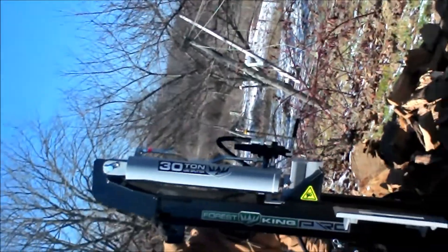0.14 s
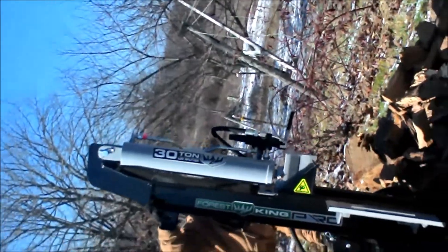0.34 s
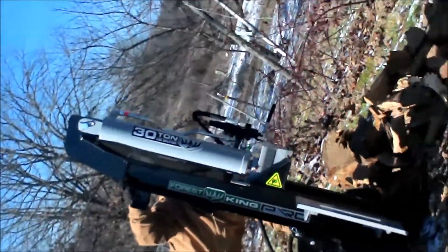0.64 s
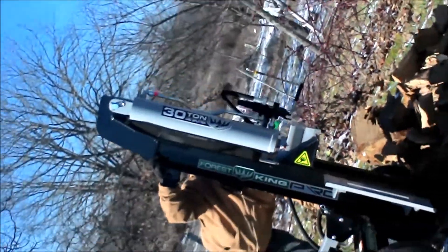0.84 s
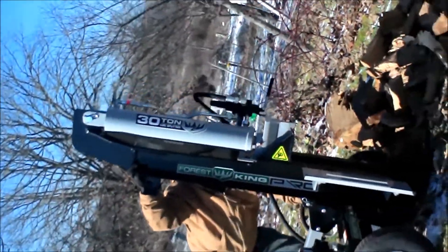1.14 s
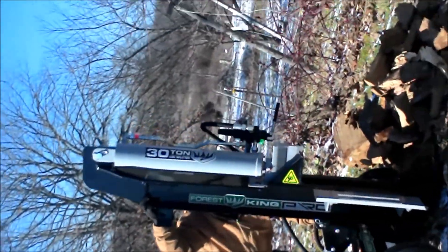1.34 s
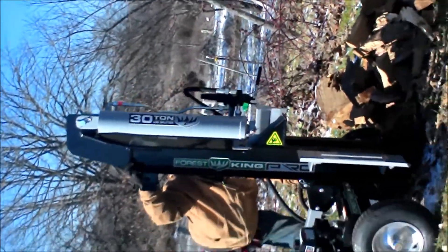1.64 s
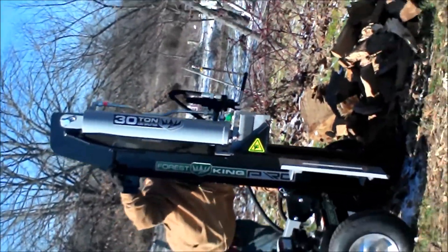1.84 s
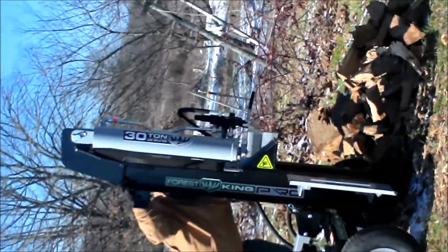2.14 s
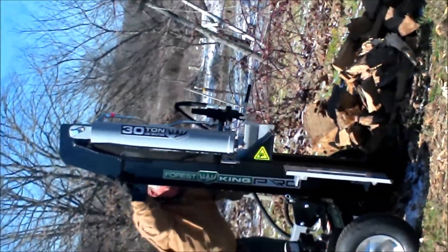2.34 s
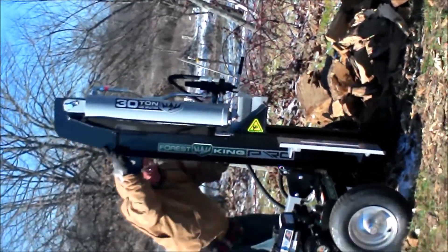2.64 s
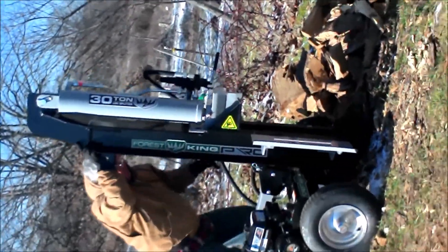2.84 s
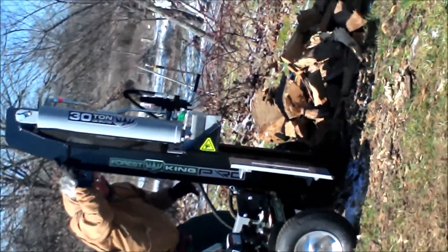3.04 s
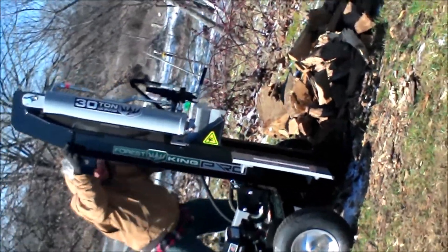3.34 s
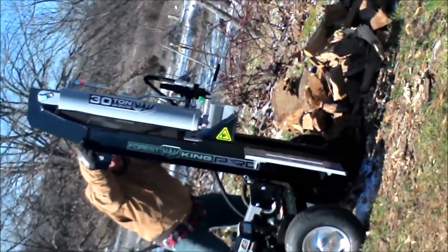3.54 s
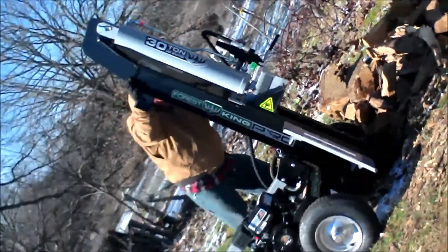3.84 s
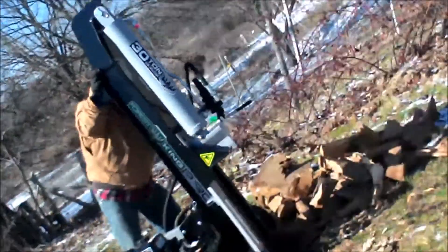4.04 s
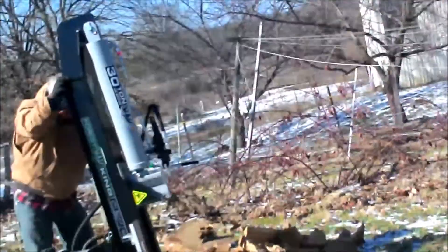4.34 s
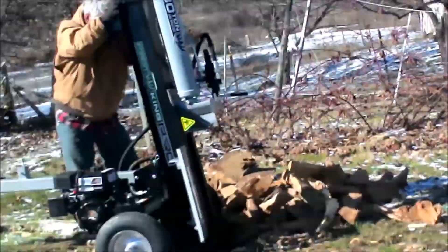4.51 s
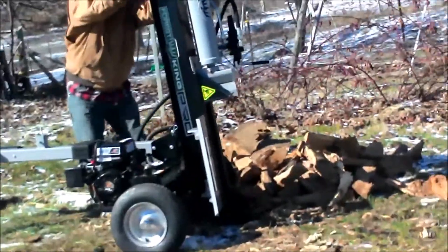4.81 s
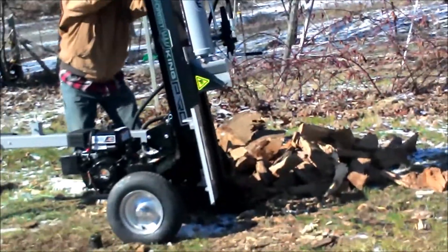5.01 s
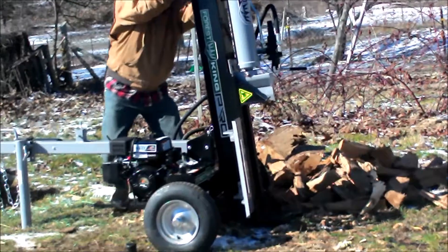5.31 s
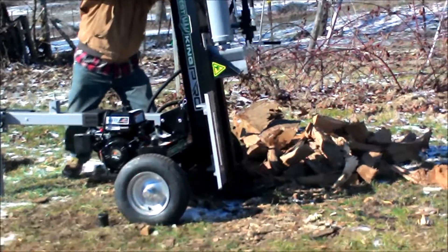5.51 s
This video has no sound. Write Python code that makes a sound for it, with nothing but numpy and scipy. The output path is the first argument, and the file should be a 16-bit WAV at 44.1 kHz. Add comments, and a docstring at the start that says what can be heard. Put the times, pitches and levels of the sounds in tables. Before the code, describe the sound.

From 0 s a small four-stroke engine on a log splitter idles steadily in an open yard, firing about seventeen times a second: low rounded exhaust thuds, busy valve clatter, a thin gear whine and pulsing pump hiss. Its speed wavers only slightly. Soft low wind rumbles faintly on the microphone around 0.6-1.4 s. At 1.95 s a log gives way in a sudden, very loud dry crack, several fractures crowded within about 50 ms, while the steel beam clanks brightly. The ring and a short scattered echo off woodpile and trees fade within roughly half a second. The recording level dips after the blow, leaving the engine somewhat quieter. The metallic treble grows duller toward 3.3 s. Between about 3.9 and 4.3 s the microphone swings and the engine becomes harder, brighter and raspier, continuing until the end at about 5.7 s. Stereo is narrow, with bass centred.

```python
"""An idling single-cylinder four-stroke on a log splitter: exhaust thuds, valve clatter, pump hiss, light breeze.
Near 2 s a log gives way: noise bursts make the crack, ringing modes the beam clank, echoes and a wash the yard.
The crank phase times the engine's gas strokes, contacts and noise, which excite pipe and block resonances.
The blow pulls the recorder gain down. Near 4 s the microphone swings round and the engine sounds harder."""
import sys
import numpy as np
from scipy import signal
from scipy.fft import rfft, irfft, next_fast_len
from scipy.io import wavfile

SR = 44100
rng = np.random.default_rng(int(sys.argv[2]) if len(sys.argv) > 2 else 0)


def master_out(mix):
    """Clip the mix to full scale and print it as 16-bit PCM to the path in sys.argv[1]."""
    frames = np.transpose(np.atleast_2d(mix))
    ceiling = np.clip(frames, -1, 1)
    pcm = np.round(ceiling * 32767).astype(np.int16)
    wavfile.write(sys.argv[1], SR, pcm)


N = 250047
TIME = np.arange(N) / SR   # s


def from_db(db):
    """Decibels to amplitude gain."""
    return 10 ** (np.asarray(db) / 20)


def rms_one(x):
    """Scale to rms 1."""
    return x / np.sqrt(np.mean(x ** 2) + 1e-20)


def in_time(rows):
    """Interpolate each column of a time curve to one value a sample."""
    s, *columns = np.transpose(rows)
    return [np.interp(TIME, s, column) for column in columns]


def at_hz(points, hz):
    """Read a spectrum on a log-frequency axis."""
    known_hz, level_db = np.transpose(points)
    return np.interp(np.log(np.maximum(hz, 1)), np.log(known_hz), level_db)


def colour(x, spectrum):
    """Causal minimum-phase filter with the given spectrum; white noise keeps its power."""
    size = 2 ** 13
    gain = rms_one(from_db(at_hz(spectrum, np.fft.rfftfreq(size, 1 / SR))))
    cepstrum = irfft(np.log(gain))[:size // 2]
    cepstrum[1:] *= 2   # fold to minimum phase
    response = irfft(np.exp(rfft(cepstrum, size)))[:size // 2]
    return signal.oaconvolve(x, response)[:N]


def resonate(x, hz, width_hz):
    """Two-pole resonance with peak gain 1."""
    r = np.exp(-np.pi * width_hz / SR)
    zeros = np.array([1, 0, -1]) * (1 - r * r) / 2
    poles = [1, -2 * r * np.cos(2 * np.pi * hz / SR), r * r]
    return signal.lfilter(zeros, poles, x + 1e-18)


def ring(x, hz, t60_s):
    """Damped mode: a unit click starts a decaying sine of height 1."""
    r = from_db(-60 / (t60_s * SR))
    w = 2 * np.pi * hz / SR
    return signal.lfilter([0, np.sin(w)], [1, -2 * r * np.cos(w), r * r], x + 1e-18)


def smooth(x, lag_s):
    """One-pole lag."""
    r = np.exp(-1 / (lag_s * SR))
    return signal.lfilter([1 - r], [1, -r], x)


def high_pass(x, cut_hz):
    """Second-order low cut."""
    return signal.sosfilt(signal.butter(2, cut_hz, "high", fs=SR, output="sos"), x)


def clicks(times_s, sizes):
    """One click of each size at each time."""
    inside = (times_s >= 0) & (times_s < TIME[-1])
    return np.bincount((times_s[inside] * SR).astype(int), sizes[inside], N)


def dying(start_s, decay_s):
    """Envelope that jumps to 1 and falls exponentially."""
    return (TIME >= start_s) * np.exp(-np.maximum(TIME - start_s, 0) / decay_s)


def bump(x, centre, width):
    """Bell curve of height 1; width is one standard deviation."""
    return np.exp(-.5 * ((x - centre) / width) ** 2)


# wind noise spectrum, relative: [hz, level_db_per_hz]
WIND = [(15, -13.5), (45, -0.5), (90, -1), (200, -14.5), (600, -41)]
# gusts: [centre_s, peak_db, width_s]
GUSTS = [(.65, -63, .06), (0.845, -60.5, .2), (1.35, -63, 0.073)]
CALM_DB = -79   # between gusts


def breeze():
    """Light air rumbles on the microphone and rises in bell-shaped gusts."""
    gusts = sum(from_db(peak_db) * bump(TIME, centre_s, width_s) for centre_s, peak_db, width_s in GUSTS)
    return (from_db(CALM_DB) + gusts) * colour(rng.standard_normal(N), WIND)


# echoes off woodpile and sheds: [delay_s, level_db]
ECHOES = [(0.033, -24.5), (0.102, -22.5), (.135, -27)]
# scattered sound spectrum, relative: [hz, level_db_per_hz]
YARD = [(240, -41.5), (400, -19), (680, -22.5), (854, -2), (1140, -17), (1640, -5), (3290, -9.5),
        (6220, -7.5), (7580, -12.5), (8060, -20.5), (10900, -11), (12900, -42.5), (15000, -36)]


def yard(x, scatter_db, scatter_s, build_s):
    """Distinct echoes, and a noise wash scattered by the trees that follows the lagged power of the blow."""
    echoes = sum(from_db(level_db) * np.interp(TIME - delay_s, TIME, x, left=0) for delay_s, level_db in ECHOES)
    lingering = np.sqrt(smooth(smooth(x ** 2, scatter_s), build_s) + 1e-18)
    wash = lingering * colour(rng.standard_normal(N), YARD)
    return x + echoes + from_db(scatter_db) * wash


# crack spectrum, relative: [hz, level_db_per_hz]
CRACK = [(240, -65.5), (400, -32), (1000, -16.5), (1360, -19.5), (2030, -5.5), (2220, -13.5), (2470, -5.5),
         (3160, -24), (3680, -8), (5070, 0), (7790, -11), (10400, -13), (12100, -18.5), (12900, -41.5),
         (15500, -37.5)]
# run of fractures, also jolting the beam: [start_s, level_db, decay_s]
FRACTURES = [(1.9503, -19, .004), (1.9531, -11, 0.0075), (1.9588, -20.5, .006), (1.9668, -23, 0.0035),
             (1.9738, -31.5, .003), (1.985, -22.5, 0.0073), (1.9949, -35, .004), (2.002, -30, .006)]


def log_crack(rise_s, grain_db, grain_s):
    """Each fracture is a short noise burst of fibres snapping in uneven clumps."""
    force = sum(from_db(level_db) * dying(start_s, decay_s) for start_s, level_db, decay_s in FRACTURES)
    grain = rms_one(smooth(rng.standard_normal(N), grain_s))
    clumps = rms_one(from_db(grain_db * grain))
    return colour(smooth(force, rise_s) * clumps * rng.standard_normal(N), CRACK)


# steel beam modes: [pitch_hz, level_db, t60_s before load damping]
BEAM = [(640, -17, .35), (845, -15, .8), (1023, -13, .3), (1297, -15, .37), (1492, -7, .3),
        (1622, -13, 1.4), (1690, -13, 1.4), (1760, -9, .25), (2082, -5, .28), (2277, -7, .3),
        (2487, -7, .3), (2568, -10, .35), (2751, -10, .2), (3585, -12, .25), (3807, -5, .2),
        (4351, -6, .27), (4506, 0, .22), (4748, -6, .22), (5011, -2, .15), (5153, -1, .22), (5717, -7, .26),
        (6125, -6, .22), (6340, -5, .3), (6875, -11, .35), (7301, -6, .33), (8848, -18, .33),
        (9145, -13, .21), (9765, -18, .3), (10115, -14, .23), (10603, -11, .42)]
BEAM_DAMPING_S = 0.501   # the load mutes the longest rings


def beam_clank(level_db):
    """Every fracture jolts each steel mode in a random direction; the loaded beam dies faster."""
    start_s, jolt_db, _ = np.transpose(FRACTURES)
    clank = 0
    for pitch_hz, mode_db, t60_s in BEAM:
        jolts = from_db(jolt_db) * rng.choice([-1, 1], len(start_s))
        clank = clank + from_db(level_db + mode_db) * ring(clicks(start_s, jolts), pitch_hz, t60_s)
    return clank * dying(start_s[0], BEAM_DAMPING_S)


def log_split():
    """Crack and clank together, heard across the yard."""
    crack = from_db(2.0) * log_crack(rise_s=.0007, grain_db=3.0, grain_s=0.00035)
    blow = crack + beam_clank(level_db=-15)
    return yard(blow, scatter_db=-13.5, scatter_s=0.024, build_s=0.014)


SWELL_DB, SWELL_AT_MS, SWELL_WIDTH_MS = 1.5, -1.0, 3.5   # ms after the firing
LULL_DB, LULL_AT_MS, LULL_WIDTH_MS = -2.5, 27, 4.6


def gas_rush(cycle, speed_hz):
    """Gas and gear noise swells once a cycle as the exhaust valve opens, and sinks once."""
    def near(at_ms, width_ms):
        """Bell round one moment of every cycle."""
        phase = (cycle - speed_hz * at_ms / 1000 + .5) % 1
        return bump(phase, .5, speed_hz * width_ms / 1000)
    swell_db = SWELL_DB * near(SWELL_AT_MS, SWELL_WIDTH_MS)
    lull_db = LULL_DB * near(LULL_AT_MS, LULL_WIDTH_MS)
    return rms_one(from_db(swell_db + lull_db))


def fins(x, ring_db, ring_s):
    """Cooling fins and covers add a thicket of brief, unrelated resonances."""
    t = TIME[:SR // 25]
    response = rng.standard_normal(len(t)) * np.exp(-t / ring_s)
    response = response / np.linalg.norm(response)
    return rms_one(x + from_db(ring_db) * signal.oaconvolve(x, response)[:N])


# hiss spectra from side and front, relative: [hz, level_db_per_hz]
HISS_SIDE = [(300, -0.5), (650, -2.5), (900, -0.5), (2500, 1.5), (3150, -13), (3600, -4), (4050, -8.5),
             (5000, -2), (6600, -3.5), (8350, -19.5), (9400, -9.5), (11500, -20), (13300, -25.5),
             (15000, -22)]
HISS_FRONT = [(300, 12.5), (600, -2.5), (900, -7.5), (2000, 2.5), (2400, 2), (2950, 7.5), (3700, -14.5),
              (5000, -4.5), (6300, 1.5), (8000, -8), (9600, -8), (11500, -20), (15000, -17.5)]
PUMP_TEETH_PER_CYCLE = 22


def hiss(cycle, rush, knocks, front, tooth_depth, tick_s, tick_db):
    """Gas and gear noise pulses with the pump's teeth; each contact adds a short bright tick."""
    teeth = 1 + tooth_depth * np.cos(2 * np.pi * PUMP_TEETH_PER_CYCLE * cycle)
    ticks = from_db(tick_db) * rms_one(smooth(knocks, tick_s))
    strength = np.hypot(rush * teeth, ticks)
    noise = fins(strength * rng.standard_normal(N), ring_db=-5.5, ring_s=0.0036)
    return (1 - front) * colour(noise, HISS_SIDE) + front * colour(noise, HISS_FRONT)


GEAR_TEETH, WHINE_DB = 31, -14   # level against the clatter


def gear_whine(cycle):
    """Crank gear teeth mesh in a thin tone, two turns a cycle."""
    return from_db(WHINE_DB) * rms_one(np.sin(2 * np.pi * GEAR_TEETH * 2 * cycle))


# valve train and piston contacts: [after_firing_ms, level_db relative]
CONTACTS = [(-8.5, -2.5), (-4.5, -3), (-1.5, -0.5), (0.68, -1), (4.5, -10), (9.5, -2.5), (13.5, -2),
            (16.5, -4.5), (21.5, -4), (26.5, -7.5), (32, -4), (34, -3), (38, -2.5), (43, -5.5), (47, -8.5)]
# shroud, tank and block resonances: [pitch_hz, width_hz, level_db relative]
BLOCK = [(430, 86, -12), (632.5, 25, -8.5), (830.3, 40, -0.5), (949, 45, -1.5), (1064, 9, 6.5),
         (1107, 27, 0), (1206, 77, -3), (1302, 38, 0.5), (1422, 90, -8.5), (1610, 45, 1), (1712.5, 40, 0),
         (2057, 86, -11.5), (2500, 160, -22)]
SHADED_ABOVE_HZ = 1050   # the frame screens only the clatter above this


def clatter(firings_s, rush, tilt_db, jitter_s, uneven_db, stroke_db, rattle_db):
    """Contacts recur each cycle, never quite alike, and ring the block over a loose rattle."""
    knocks = 0
    effort_db = stroke_db * rng.standard_normal(len(firings_s))
    for after_ms, level_db in CONTACTS:
        late, strength = rng.standard_normal((2, len(firings_s)))
        times_s = firings_s + after_ms / 1000 + jitter_s * late
        knocks = knocks + clicks(times_s, from_db(level_db + effort_db + uneven_db * strength))
    drive = rms_one(knocks) + from_db(rattle_db) * rush * rng.standard_normal(N)
    body = 0
    for k, (pitch_hz, width_hz, level_db) in enumerate(BLOCK):
        octaves_up = np.log2(max(pitch_hz / SHADED_ABOVE_HZ, 1))
        gain = (-1) ** k * from_db(level_db + tilt_db * octaves_up)   # alternating polarity
        body = body + gain * resonate(drive, pitch_hz, width_hz)
    return rms_one(body), knocks


INTAKE_SHUT_MS, AIRBOX_HZ, AIRBOX_WIDTH_HZ = 22.5, 367, 90
AIRBOX_DB = -23.5   # against the exhaust


def airbox(firings_s):
    """The intake valve shuts and the air box gives a short hollow pop."""
    shut = clicks(firings_s + INTAKE_SHUT_MS / 1000, np.ones(len(firings_s)))
    pop = resonate(resonate(shut, AIRBOX_HZ, AIRBOX_WIDTH_HZ), AIRBOX_HZ, AIRBOX_HZ)
    return from_db(AIRBOX_DB) * rms_one(pop)


# exhaust then intake stroke: [after_firing_ms, build_ms, shut_ms, level_db relative]
STROKES = [(0, 0.83, 0.64, -1), (15.2, 2.5, 0.33, -11.5)]
# exhaust pipe resonances: [pitch_hz, width_hz, level_db against the muffler box]
PIPE = [(309, 19, -8.5), (380.3, 8.2, -5), (432.4, 25, -5), (523, 19, -11.5)]


def gas_strokes(firings_s, box_hz, box_width_hz, low_cut_hz, uneven_db):
    """Flow builds through a valve and is shut off; the sudden stop booms the muffler box and pipe."""
    sizes = from_db(uneven_db * rng.standard_normal(len(firings_s)))
    ms = np.arange(-SR // 100, SR // 100 + 1) * 1000 / SR
    flow = 0
    for after_ms, build_ms, shut_ms, level_db in STROKES:
        gulp = bump(ms, 0, np.where(ms < 0, build_ms, shut_ms))
        strokes = clicks(firings_s + after_ms / 1000, sizes)
        flow = flow - from_db(level_db) * signal.oaconvolve(strokes, gulp, "same")
    boom = resonate(flow, box_hz, box_width_hz)
    for pitch_hz, width_hz, level_db in PIPE:
        boom = boom + from_db(level_db) * resonate(flow, pitch_hz, width_hz)
    return rms_one(high_pass(boom, low_cut_hz))   # a small outlet radiates no deep bass


# the governor hunts round idle: [time_s, firings_hz]
SPEED = [(0.0, 17.113), (0.68, 17.119), (0.85, 16.69), (1.12, 17.169), (1.75, 16.926), (2.03, 17.334),
         (2.15, 16.952), (2.77, 17.016), (2.92, 17.223), (3.37, 17.226), (3.58, 16.912), (3.92, 17.293),
         (4.47, 16.977), (4.67, 17.177), (5.67, 17.241)]
# clatter at the microphone: [time_s, level_db, treble_tilt_db_per_octave]
CLATTER_HEARD = [(0, -47.5, 1), (.45, -50, 1), (1.9, -51, 0), (3.25, -50.5, -8), (3.85, -51, -1.5),
                 (4.25, -49, 4.5), (4.8, -50, 2), (5.67, -49, -0.5)]
# microphone swing: [time_s, front_share of the hiss 0-1]
FRONT = [(3.2, 0.18), (3.85, 0.2), (4.25, 1), (4.8, 0.8), (5.67, 0.86)]
FIRST_FIRING_S = .0082
EXHAUST_DB, SAG_DB = -45, 1   # the throttle opens on a sag: dB per firing per second lost
HISS_DB, HISS_FOLLOWS, HISS_FRONT_DB = -52.5, .35, -1   # level, share of clatter swing, change at the front
HISS_LOW_CUT_HZ = 70
RASP_HZ, RASP_WIDTH_HZ, RASP_DB = 2954, 560, -2   # thrown forward
RASP_BEAMING = 5.1   # power of the front share


def engine():
    """Everything follows the crank: one cycle is two turns and one firing."""
    speed_hz, = in_time(SPEED)
    cycle = np.cumsum(speed_hz) / SR
    firings_s = np.interp(np.arange(int(cycle[-1]) + 1), cycle, TIME) + FIRST_FIRING_S
    rush = gas_rush(cycle - FIRST_FIRING_S * speed_hz, speed_hz)
    clatter_db, tilt_db = in_time(CLATTER_HEARD)
    front = np.clip(in_time(FRONT)[0], 0, 1)
    exhaust_db = EXHAUST_DB + SAG_DB * (speed_hz.mean() - speed_hz)
    hiss_db = HISS_DB + HISS_FOLLOWS * (clatter_db - clatter_db.mean()) + HISS_FRONT_DB * front

    thuds = gas_strokes(firings_s, box_hz=185.5, box_width_hz=83.6, low_cut_hz=78, uneven_db=0.82)
    thuds = thuds + airbox(firings_s)
    metal, knocks = clatter(firings_s, rush, tilt_db, jitter_s=.00006, uneven_db=1.25,
                            stroke_db=0.9, rattle_db=-3.5)
    metal = metal + gear_whine(cycle)
    air = hiss(cycle, rush, knocks, front, tooth_depth=0.2, tick_s=.0012, tick_db=-8.0)
    air = high_pass(air, HISS_LOW_CUT_HZ)
    rasp = from_db(RASP_DB) * front ** RASP_BEAMING * resonate(air, RASP_HZ, RASP_WIDTH_HZ)
    return from_db(exhaust_db) * thuds + from_db(clatter_db) * metal + from_db(hiss_db) * (air + rasp)


PORT_LAG_S = .000021   # left after right


def microphones(x, shared_below_hz):
    """Two close ports: the bass is common to both, and the left hears the rest a little later."""
    size = next_fast_len(N + SR // 10)
    hz = np.fft.rfftfreq(size, 1 / SR)
    unshared = hz ** 2 / (hz ** 2 + shared_below_hz ** 2)
    lag = np.exp(-1j * np.pi * hz * PORT_LAG_S * unshared)   # half the lag each way
    return irfft(rfft(x, size) * np.array([lag, 1 / lag]), size)[:, :N]


def scene():
    """Breeze, splitting log and engine at the two ports."""
    return microphones(breeze() + log_split() + engine(), shared_below_hz=680)


def gain_control(x, threshold_db, most_db, attack_s, sink_db_per_s):
    """A loud peak pulls the gain down for good, over a slow steady sink."""
    peak_db = 20 * np.log10(np.abs(x).max(axis=0) + 1e-9)
    over_db = np.clip(peak_db - threshold_db, 0, most_db)
    sink_db = sink_db_per_s * TIME
    held_db = np.maximum.accumulate(over_db - sink_db) + sink_db
    return x * from_db(-smooth(smooth(held_db, attack_s), attack_s))


CUTOFF_HZ = 15750


def record(dry):
    """Gain control, rounded peaks, then a steep top cut."""
    levelled = gain_control(dry, threshold_db=-18, most_db=8.0, attack_s=0.077, sink_db_per_s=0.16)
    top_cut = signal.ellip(12, .1, 80, CUTOFF_HZ, fs=SR, output="sos")
    return signal.sosfilt(top_cut, np.tanh(levelled))


dry = scene()
out = record(dry)
master_out(out)
```